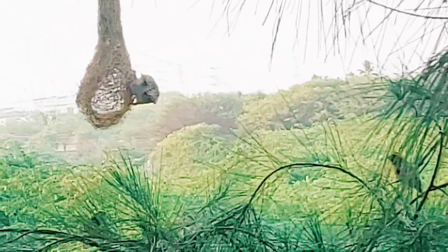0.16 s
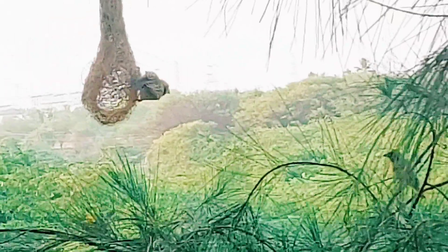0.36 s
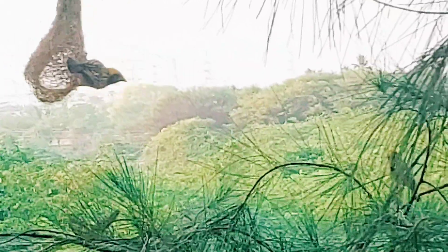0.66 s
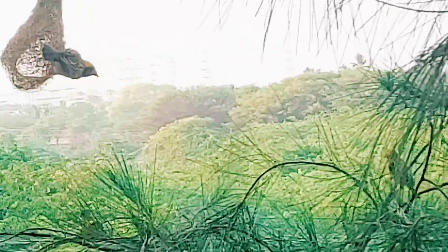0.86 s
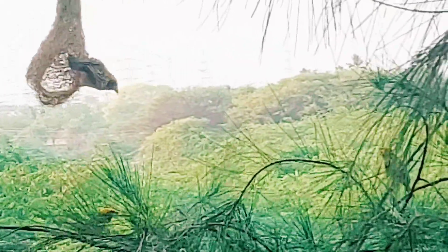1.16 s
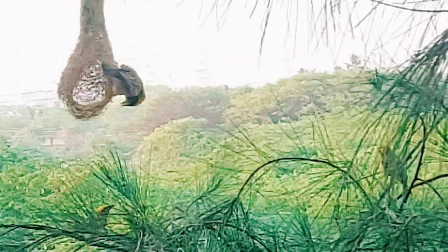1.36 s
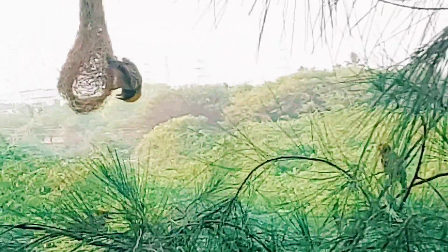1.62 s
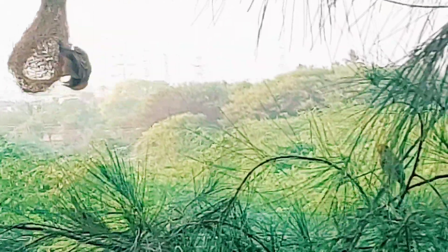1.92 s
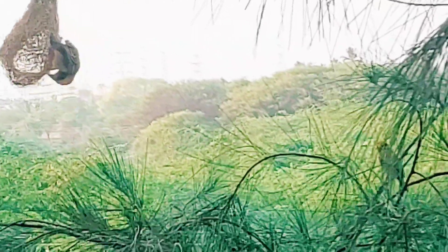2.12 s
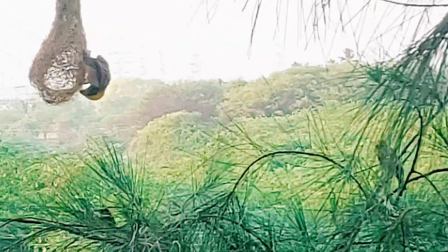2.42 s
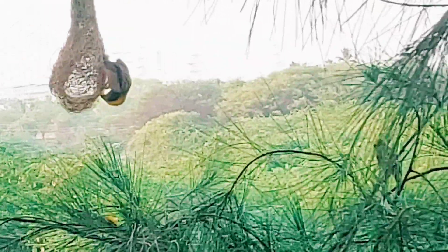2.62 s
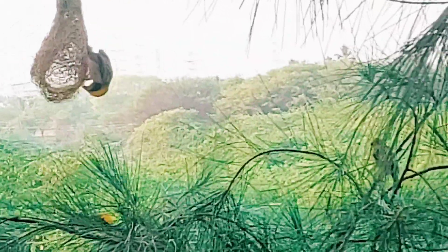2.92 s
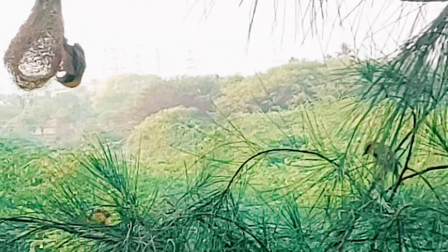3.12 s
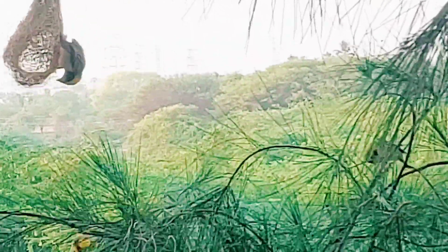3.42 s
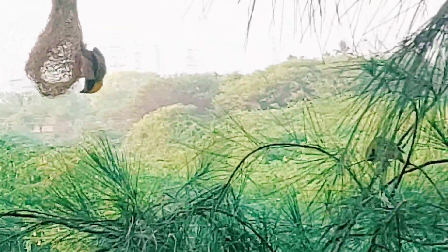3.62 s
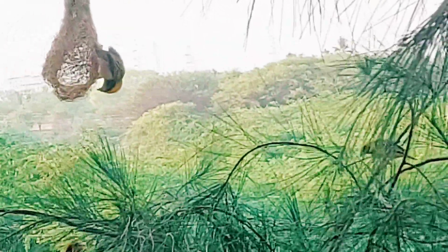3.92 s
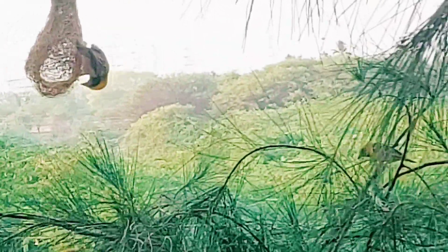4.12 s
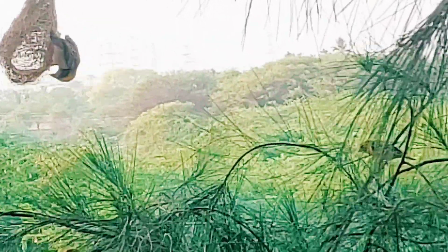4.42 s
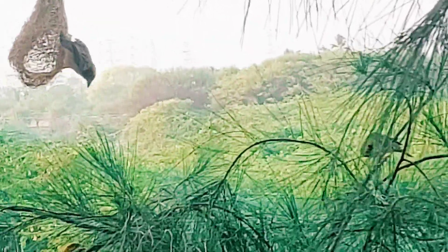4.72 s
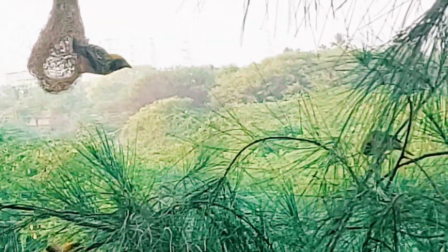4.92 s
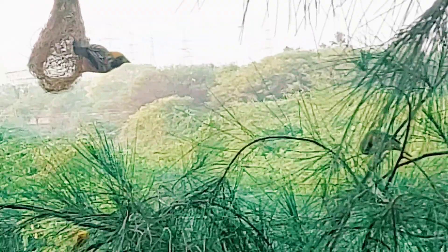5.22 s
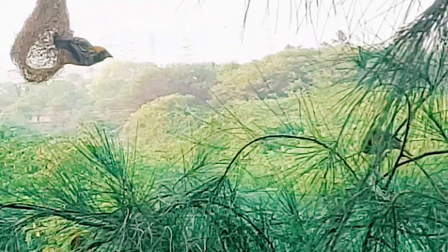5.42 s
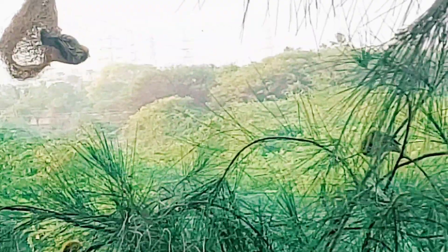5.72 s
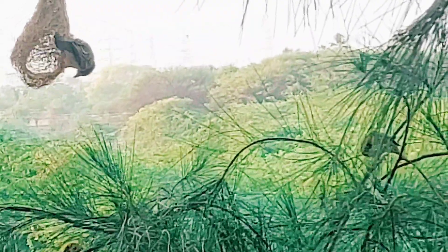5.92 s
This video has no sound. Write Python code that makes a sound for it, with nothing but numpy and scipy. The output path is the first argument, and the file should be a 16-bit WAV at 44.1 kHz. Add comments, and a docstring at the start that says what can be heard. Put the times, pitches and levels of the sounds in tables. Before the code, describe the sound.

Weaver birds chirp, chatter, whistle and buzz loudly in a dense high-pitched colony chorus outdoors, over soft leaf wash and a faint low rumble.

```python
"""Weaver birds sing nearby: looping chirps, fast chatter, wheezing buzzes, thin whistles, short slurs and peeps.
Each voice is a nearly pure tone that the syrinx, the bird's voice organ, sweeps up and down.
Short echoes from nearby surfaces smear the calls, and noise that follows their strength hisses along.
Behind them are distant nests, a soft wash of colony and leaves, and the low rumble of a distant town.
The loud calls overload the two microphones."""
import sys
import numpy as np
from scipy import signal
from scipy.fft import rfft, irfft
from scipy.io import wavfile
from scipy.ndimage import uniform_filter1d, map_coordinates

SR = 44100
rng = np.random.default_rng(int(sys.argv[2]) if len(sys.argv) > 2 else 0)


def wrap_up_sound(samples):
    """Save the sound to the file named by the first command line argument, as 16-bit audio."""
    columns = np.atleast_2d(samples).T
    # keep every value between -1 and 1, then stretch to whole-number steps
    tamed = np.clip(columns, -1, 1)
    steps = np.round(tamed * 32767).astype(np.int16)
    wavfile.write(sys.argv[1], SR, steps)


N = 267246
TIME = np.arange(N) / SR


def undb(db):
    """Turn decibels into a plain multiplier."""
    return 10 ** (np.asarray(db) / 20)


def unit(x):
    """Scale a sound to an average (rms) strength of 1."""
    return x / np.sqrt(np.mean(x ** 2))


def colour(x, points):
    """Make some pitches louder than others: (f/Hz, level/dB) points joined on a log-frequency axis."""
    hz, db = np.transpose(points)
    bins = np.maximum(np.fft.rfftfreq(x.shape[-1], 1 / SR), 1)
    gain = undb(np.interp(np.log(bins), np.log(hz), db))
    return irfft(rfft(x) * gain, x.shape[-1])


def wander(t, rate):
    """Smooth random drift with a spread near 1, drawn from `rate` random values a second."""
    place = (t - t[0]) * rate
    return map_coordinates(rng.standard_normal(8192), [place], order=3, mode="wrap")


def span(start, length):
    """Sample times of a call, in seconds."""
    return start + np.arange(max(int(length * SR), 2)) / SR


def fade(t, rise, fall):
    """Soft start and end of a call; rise and fall are in seconds."""
    nearest_end = np.minimum((t - t[0]) / rise, (t[-1] - t) / fall)
    return np.sin(np.pi / 2 * np.clip(nearest_end, 0, 1))


def add(track, t, sound):
    """Mix a call into the track, dropping what lies outside it."""
    at = int(round(t[0] * SR)) + np.arange(len(t))
    inside = (at >= 0) & (at < N)
    track[at[inside]] += sound[inside]


def syrinx(t, hz, rasp=0, jitter=0.00697, rasp_depth=0.1272, flutter_db=2.55, octave_db=-22):
    """The bird's voice: a swept tone with a weak, husky octave above; rasp shakes its pitch."""
    hz = hz * (1 + (jitter + rasp * rasp_depth) * wander(t, 500))
    phase = 2 * np.pi * (np.cumsum(hz) / SR + rng.random())
    octave = np.sin(2 * phase + 1.35 * wander(t, 500))
    return (np.sin(phase) + undb(octave_db) * octave) * undb(flutter_db * wander(t, 200))


def warble(t, centre_hz, rate, swing_hz, uneven, lean):
    """Pitch that swings about `rate` times a second; with lean it rises faster than it falls."""
    cycle = 2 * np.pi * np.cumsum(rate * (1 + uneven * wander(t, 110))) / SR
    swing = np.sin(cycle + lean * np.sin(cycle))
    return centre_hz + swing_hz * (1 + 0.13 * wander(t, 130)) * swing


def add_note(track, start, length, first_hz, middle_hz, last_hz, db, rasp, second_ratio=.88):
    """Sing a smooth curve through three pitches; in harsh notes a second, lower voice joins."""
    t = span(start, length)
    curve = np.polyfit([0, .5, 1], [first_hz, middle_hz, last_hz], 2)
    hz = np.polyval(curve, np.linspace(0, 1, len(t)))
    second_share = np.clip(2 * rasp - .5, 0, 1)
    voice = syrinx(t, hz, rasp) + second_share * syrinx(t, second_ratio * hz, rasp)
    add(track, t, voice * undb(db) * fade(t, .4 * length, .35 * length))


def add_slur(track, start, length, first_hz, last_hz, ease, db, rasp):
    """Sing a fall that is fast at first and then eases; ease is the share still to come halfway."""
    middle_hz = last_hz + ease * (first_hz - last_hz)
    add_note(track, start, length, first_hz, middle_hz, last_hz, db, rasp)


# Three leaps up from a low resting pitch, before each chirp's own pitch ratio and level:
# (t/s from the first crest, crest f/Hz, half width t/s, added level/dB)
CHIRP_LEAPS = [(0, 5812, .014, 5.5), (.05, 5513, .0062, 8.5), (.084, 5520, .0056, 7.5)]
CHIRP_REST_HZ, CHIRP_SAG_HZ, CHIRP_REST_DB = 3620, 798.5, -4.5  # before ratio and level, as above
CHIRP_LEAD_S, CHIRP_LENGTH_S, CHIRP_ATTACK_S = .034, .135, 0.038
# High arch over the first leap, before the pitch ratio: (start f/Hz, middle f/Hz, end f/Hz)
CROWN_HZ = (4500, 6070, 5906)
CROWN_LEAD_S, CROWN_LENGTH_S, CROWN_DB = .04, 0.057, -8.5  # level relative to the chirp


def add_chirp(track, crest, ratio, db, stop):
    """Each leap in pitch is also a surge in level; the other side of the syrinx adds a high arch."""
    t = span(crest - CHIRP_LEAD_S, min(CHIRP_LEAD_S + stop, CHIRP_LENGTH_S))
    rest_hz = CHIRP_REST_HZ - CHIRP_SAG_HZ * ((t - t[0]) / CHIRP_LENGTH_S) ** 4
    hz, level_db = rest_hz, db + CHIRP_REST_DB
    for when, top_hz, width, surge_db in CHIRP_LEAPS:
        leap = np.exp(-.5 * ((t - crest - when) / width) ** 2)
        hz = hz + (top_hz - rest_hz) * leap
        level_db = level_db + surge_db * leap
    add(track, t, syrinx(t, ratio * hz) * undb(level_db) * fade(t, CHIRP_ATTACK_S, 0.012))
    crown_hz = np.sqrt(ratio) * np.array(CROWN_HZ)
    add_note(track, crest - CROWN_LEAD_S, CROWN_LENGTH_S, *crown_hz, db + CROWN_DB, 0)


# Looping chirps: (first crest t/s, pitch ratio, relative level/dB, latest stop after the crest t/s)
CHIRPS = [(.562, 1.14, -7.5, 0.076), (.688, 0.97, -9, 0.091), (1.765, 1.015, -10.5, 0.09),
          (2.267, 1.015, -10.5, .1), (2.686, 1.054, -8, 0.078), (3.83, 1.015, -12, .12),
          (4.1, 1.026, -8, 0.09), (4.258, 1.11, -14.5, 0.075), (4.501, 1, -7, .14), (4.874, 1.03, -8, 0.09),
          (5.086, 1.05, -8, 0.092), (5.293, 1.037, -11, 0.097), (5.499, 1.03, -10.5, 0.1)]


def chirps():
    """Looping chirps in two voices: a leaping pitch and a high arch."""
    track = np.zeros(N)
    for chirp in CHIRPS:
        add_chirp(track, *chirp)
    return track


# Chatter syllables, each a fast warble and then a falling slur:
# (start t/s, warble length t/s, relative warble level/dB, slur end f/Hz, relative slur level/dB)
CHATTER = [(0.057, 0.16, -12.5, 3520, -24), (0.208, 0.087, -12.5, 3770, -39),
           (0.742, 0.068, -7.5, 2614, -8.5), (0.854, 0.085, -7.5, 2643, -14), (0.966, 0.098, -6, 3220, -3),
           (1.105, 0.093, -5, 2822, -5), (1.315, .094, -6.5, 3070, -9.5), (4.388, 0.097, -19.5, 3010, -28),
           (4.451, .042, -7.5, 2957, -6), (4.538, .088, -5.5, 2940, -9), (4.662, 0.087, -4.5, 2970, -7),
           (4.794, 0.081, -5, 3036, -7.5), (4.921, 0.083, -7.5, 2960, -8.5),
           (5.633, 0.082, -14, 2990, -12.5)]
CHATTER_HZ, WARBLES_PER_S, CHATTER_SLUR_S = 4757, 78, .044
CHATTER_SLUR_EASE = .3  # share of the fall still to come halfway


def chatter(slur_top_hz=4100, split_hz=560, first_swing_hz=1000, last_swing_hz=330, arch_hz=330):
    """Fast syllables: wide pitch swings narrow and split into two voices, then a slur falls away."""
    track = np.zeros(N)
    for start, length, db, end_hz, slur_db in CHATTER:
        t = span(start, length)
        progress = np.linspace(0, 1, len(t))
        apart = np.clip(1.6 * progress, 0, 1)
        swing_hz = first_swing_hz + apart * (last_swing_hz - first_swing_hz)
        # the pitch sags as the syllable ends
        centre_hz = CHATTER_HZ + arch_hz * (.25 - progress ** 4)
        hz = warble(t, centre_hz, WARBLES_PER_S, swing_hz, uneven=0.1755, lean=0.813)
        upper = syrinx(t, hz + split_hz * apart, rasp=0.066)
        lower = syrinx(t, hz - split_hz * (.5 + .6 * apart), rasp=0.079) * apart
        add(track, t, (upper + lower) * undb(db - 1) * fade(t, .024, .007))
        slur_start = start + length - .006
        add_slur(track, slur_start, CHATTER_SLUR_S, slur_top_hz, end_hz, CHATTER_SLUR_EASE, slur_db, 0.065)
    return track


# Wheezing buzzes, one list of points each: (t/s, relative level/dB)
BUZZES = [
    [(1.44, -15.5), (2.162, -10), (2.17, -10.5), (2.604, -12), (2.742, -9), (2.888, -13), (2.94, -27)],
    [(5.83, -16), (5.864, -14.5), (5.942, -10), (6.002, -22), (6.02, -11)],
]
# pitch and steady share (0-1) settle together towards these values
BUZZ_START_HZ, BUZZ_SETTLED_HZ, BUZZ_SETTLE_S, BUZZ_STEADY = 4574, 4870, .4, 0.88


def wheeze(db=4.0, clean_db=-4.5):
    """Buzzes: an uneven shake in pitch gives way to a fast, steady flutter that splits the tone into lines."""
    track = np.zeros(N)
    for points in BUZZES:
        s, points_db = np.transpose(points)
        t = span(s[0], s[-1] - s[0])
        settled = 1 - np.exp(-(t - t[0]) / BUZZ_SETTLE_S)
        centre_hz = BUZZ_START_HZ + settled * (BUZZ_SETTLED_HZ - BUZZ_START_HZ)
        steady = np.clip(BUZZ_STEADY * settled, 0, 1)
        rough_hz = warble(t, centre_hz, rate=112, swing_hz=795, uneven=0.15, lean=0.55)
        rough = syrinx(t, rough_hz, rasp=0.1755)
        drifting_hz = centre_hz + 14 * wander(t, 24.92)
        flutter_hz = warble(t, drifting_hz, rate=330, swing_hz=1080, uneven=0.0301, lean=0.059)
        clean = undb(clean_db) * syrinx(t, flutter_hz)
        voice = np.sqrt(1 - steady) * rough + np.sqrt(steady) * clean
        level_db = db + np.interp(t, s, points_db) + 1.1 * wander(t, 70.5)
        add(track, t, voice * undb(level_db) * fade(t, 0.0062, 0.074))
    return track


# Pure whistles, most of them sinking: (start t/s, length t/s, start f/Hz, end f/Hz, relative level/dB)
WHISTLES = [(.04, 0.1, 3540, 3310, -24), (0.225, 0.11, 5320, 4830, -8), (0.304, 0.2, 4948, 3608, -7.5),
            (.375, 0.2, 5820, 5142, -11.5), (0.442, 0.13, 4530, 4350, -13.5),
            (.632, .11, 3280, 3212, -13.5), (1.32, .16, 3680, 3615, -15), (1.46, 0.29, 3600, 3587, -11),
            (2.08, 0.7, 2475, 2607, -30.5), (2.416, .25, 3450, 3210, -22.5),
            (2.942, 0.063, 2800, 2490, -22), (3.695, .15, 2730, 2550, -30.5),
            (4.182, 0.082, 3078, 3045, -25), (5.724, 0.096, 4100, 3753, -10),
            (5.91, 0.068, 5450, 4970, -7.5)]
WHISTLE_FADE_S, WHISTLE_WAVER_DB = 0.031, 1.94


def whistles():
    """Thin whistles: tones that glide evenly between two pitches while their level wavers."""
    track = np.zeros(N)
    for start, length, first_hz, last_hz, db in WHISTLES:
        t = span(start, length)
        tone = syrinx(t, np.geomspace(first_hz, last_hz, len(t)))
        level_db = db + WHISTLE_WAVER_DB * wander(t, 25.2)
        add(track, t, tone * undb(level_db) * fade(t, WHISTLE_FADE_S, WHISTLE_FADE_S))
    return track


# Falling slurs: (start t/s, length t/s, start f/Hz, relative level/dB, rasp 0-1)
SLURS = [(-.005, 0.037, 6870, -11, 0.25), (.39, .092, 3200, -23, 0.15), (.615, 0.032, 5000, -17, 0.1),
         (.621, .02, 8220, -13.5, .2), (1.273, 0.048, 4160, -19.5, 0.37), (1.313, 0.016, 7000, -12.5, 0),
         (1.482, 0.021, 7210, -10, 0.18), (1.917, 0.039, 4090, -22.5, 0.47),
         (2.199, 0.12, 3804, -18.5, 0.18), (2.897, 0.051, 4280, -15, .08), (3.079, 0.045, 5130, -35, .4),
         (3.117, 0.049, 5005, -21, 0.71), (3.102, 0.11, 2855, -32, 0.34), (3.341, 0.056, 4380, -24.5, 0.5),
         (3.668, 0.07, 3293, -29, 0.42), (3.916, 0.097, 3560, -24.5, 0.58),
         (4.128, 0.073, 3610, -23.5, 0.6), (4.318, .09, 3495, -22, 0.64), (4.391, 0.082, 4380, -24, 0.4),
         (5.627, 0.048, 3480, -25, .5), (5.669, 0.024, 6300, -21, 0.12), (5.722, 0.039, 4860, -13, 0.25),
         (5.898, 0.04, 4480, -18, 0.29), (6.034, 0.026, 6370, -15, 0.68)]
SLUR_FALL, SLUR_EASE = .34, .42  # share of the pitch that is lost; share of that fall still to come halfway


def slurs():
    """Single notes from the nests around that fall in pitch, some of them raspy."""
    track = np.zeros(N)
    for start, length, hz, db, rasp in SLURS:
        add_slur(track, start, length, hz, hz * (1 - SLUR_FALL), SLUR_EASE, db, rasp)
    return track


# Arched peeps:
# (start t/s, length t/s, crest f/Hz, share of pitch lost at both ends 0-1, relative level/dB, rasp 0-1)
PEEPS = [(0.027, 0.041, 6190, 0.14, -8.5, 0.01), (0.205, 0.034, 6440, .08, -13, 0.1),
         (0.269, .05, 6390, 0.14, -12.5, 0.34), (0.933, .05, 6190, 0.063, -14.5, 0.05),
         (.823, 0.26, 4000, 0.086, -10, 0.19), (1.186, 0.054, 6350, .1, -13.5, 0.09),
         (2.081, 0.058, 6570, 0.12, -18, 0.43), (2.34, 0.061, 7300, 0.16, -18, .55),
         (2.694, 0.064, 6300, 0.072, -14, 0.23), (3.318, 0.05, 4660, 0.5, -22, 0.14),
         (3.331, 0.057, 6120, 0.19, -18, 0.3), (3.578, 0.077, 4800, .16, -30.5, 0.52),
         (3.645, 0.052, 3444, .28, -24.5, 0.59), (3.649, 0.029, 6480, .25, -22, .2),
         (3.668, 0.046, 5300, 0.156, -20, 0.38), (3.943, 0.042, 5410, .1, -19.5, 0.46),
         (3.986, .1, 3620, .08, -31, 0.46), (4.216, 0.048, 7170, 0.094, -23, 0.19),
         (4.297, 0.038, 5760, 0.22, -15, .2), (5.236, 0.028, 8400, .14, -17.5, 0.2),
         (5.232, 0.039, 4260, 0.037, -19, 0.26), (5.679, 0.054, 4760, .1, -10, 0.07),
         (5.777, 0.16, 5734, 0.098, -8.5, 0.03)]


def peeps():
    """Single notes from the nests around whose pitch rises to a crest and falls back."""
    track = np.zeros(N)
    for start, length, hz, bend, db, rasp in PEEPS:
        end_hz = hz * (1 - bend)
        add_note(track, start, length, end_hz, hz, end_hz, db, rasp)
    return track


def surroundings(x, early_db, late_db, left_db, left_lag=0):
    """Direct sound (left_lag samples later on the left), quick scatter off nearby surfaces, and a faint tail."""
    t = span(0, .5)
    arrival = np.clip((t - .002) / .008, 0, 1)
    t60 = np.array([[.14], [.36]])  # seconds for scatter and tail to die away by 60 dB
    out = []
    for direct, lag in ((undb(left_db), left_lag), (1, 0)):
        scatter, tail = rng.standard_normal((2, len(t))) * arrival * 1e-3 ** (t / t60)
        response = (undb(early_db) * unit(scatter) + undb(late_db) * unit(tail)) / np.sqrt(len(t))
        response[lag] += direct
        out.append(signal.fftconvolve(x, response)[:N])
    return np.array(out)


# Throat and open beak favour some pitches: (f/Hz, level/dB)
THROAT = [(2400, -4), (3300, 2.5), (4100, 4.5), (4750, 4), (5500, 3.5), (6200, 0), (8000, -4.5), (11500, 4),
          (14000, 5)]


def flock():
    """Each group of calls gets its own echo and left-right balance, then the colour of throat and beak."""
    near = surroundings(chirps() + whistles(), early_db=-5, late_db=-4, left_db=1.5, left_lag=1)
    song = surroundings(chatter(), early_db=-5, late_db=-5, left_db=0, left_lag=2)
    buzz = surroundings(wheeze(), early_db=-3, late_db=-5, left_db=-2, left_lag=8)
    around = surroundings(slurs() + peeps(), early_db=-4, late_db=-5.5, left_db=0, left_lag=2)
    mix = undb(-1.0) * near + undb(-0.5) * song + undb(-1.5) * buzz + undb(2.0) * around
    return colour(mix, THROAT)


def stereo_noise(points, shared):
    """Coloured noise of strength 1, partly common to both microphones."""
    noise = rng.standard_normal((3, N))
    return unit(colour(noise[:2] + shared * noise[2], points))


# Colour of the hiss that follows the calls: (f/Hz, relative level/dB per Hz)
CALL_HISS = [(400, -7.5), (1000, -8.5), (2200, 1), (4000, 12), (7000, 6), (9000, -8.5), (15000, 2.5)]


def call_hiss(birds):
    """Hissing noise that follows the strength of the calls."""
    strength = np.sqrt(np.abs(uniform_filter1d(birds ** 2, size=300, axis=1)))
    return undb(-12.5) * strength ** 1.08 * stereo_noise(CALL_HISS, 0.28)


def far_twitter(count=45, db=-37):
    """Faint slurs from distant nests at random times, with strong echo."""
    track = np.zeros(N)
    for when, pitch, bend, size in rng.random((count, 4)):
        hz = 2700 * 2 ** pitch
        middle_hz = hz * (.9 + .3 * bend)
        add_note(track, when * N / SR, .03 + .05 * size, hz * 1.15, middle_hz, hz * .85, db - 8 * size, .1)
    return surroundings(track, early_db=0, late_db=0, left_db=0)


# Colour of the rest of the colony and the leaves: (f/Hz, relative level/dB per Hz)
COLONY = [(800, -10.5), (1600, -13.5), (2800, -3.5), (4500, -4), (6000, -7.5), (8000, -19.5), (15000, -33)]


def colony():
    """The rest of the colony and the leaves: a soft wash of noise whose level stirs at random."""
    stir = undb(1.5 * wander(TIME, 9))
    return undb(-36) * stir * stereo_noise(COLONY, 0.34)


# Colour of the distant town's low rumble: (f/Hz, relative level/dB per Hz)
TOWN = [(15, -51), (25, -39), (54, -1.5), (107, -1), (146, -9.5), (182, 0), (216, -7), (375, -6),
        (468, -13), (519, -10.5), (994, -19.5), (1500, -19.5), (1950, -32), (3300, -120)]
# Level of the low rumble over time: (t/s, relative level/dB)
RUMBLE_LEVEL = [(0.0, -46.5), (0.86, -44.5), (2.46, -44), (2.51, -42.5), (4.4, -39.5), (4.47, -42.5),
                (6.06, -42)]


def town_rumble():
    """A distant town: low rumbling noise whose level shifts by a few decibels and wavers a little."""
    level_db = 5 + np.interp(TIME, *np.transpose(RUMBLE_LEVEL)) + 0.51 * wander(TIME, 5.4)
    return undb(level_db) * stereo_noise(TOWN, 0.72)


def scene():
    """Birds in their surroundings, with hiss, over far twitter, colony and town."""
    birds = flock()
    return birds + call_hiss(birds) + far_twitter() + colony() + town_rumble()


def overload(x, ceiling, knee):
    """Peaks flatten against a ceiling; a higher knee is a harder bend."""
    return x / (1 + np.abs(x / ceiling) ** knee) ** (1 / knee)


# Left microphone against the right: (f/Hz, level/dB)
LEFT_COLOUR = [(40, -6), (150, -9.5), (1000, -7), (3000, -5.5), (5000, -7.2), (6500, -4.5), (7800, 2.5),
               (9500, -.5), (12000, -6), (16000, -6)]
TOP_HZ = 15900  # almost nothing passes above this


def record(dry):
    """Overload adds a treble sizzle to loud calls; the left microphone has more headroom and is mostly weaker."""
    left = overload(dry[0], ceiling=1.3, knee=2.6)
    right = overload(dry[1], ceiling=.9, knee=4.5)
    both = np.array([colour(left, LEFT_COLOUR), right])
    treble_cut = signal.ellip(10, .2, 60, TOP_HZ, fs=SR, output="sos")
    return signal.sosfilt(treble_cut, both)


dry = scene()
out = record(dry)
wrap_up_sound(out)
```